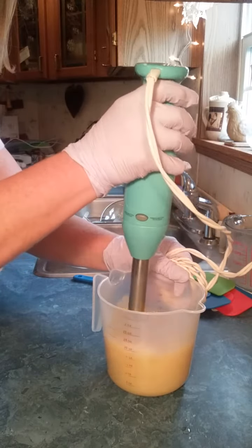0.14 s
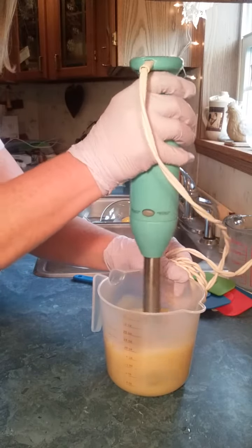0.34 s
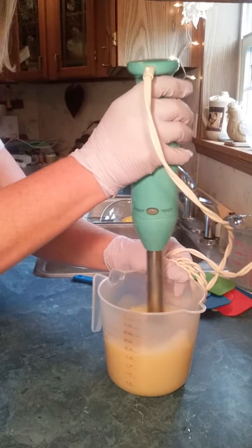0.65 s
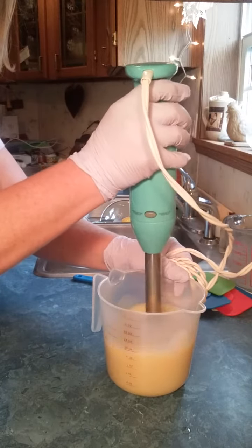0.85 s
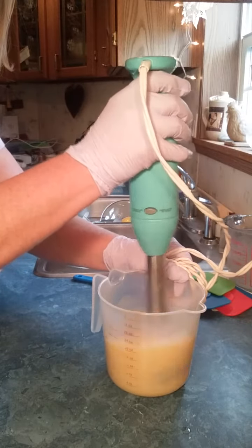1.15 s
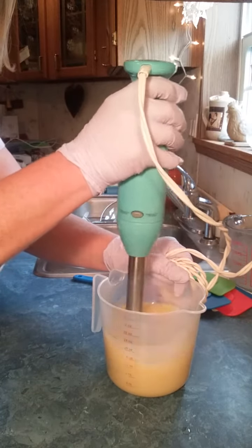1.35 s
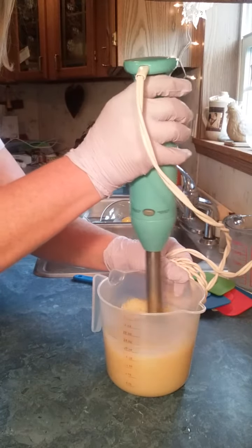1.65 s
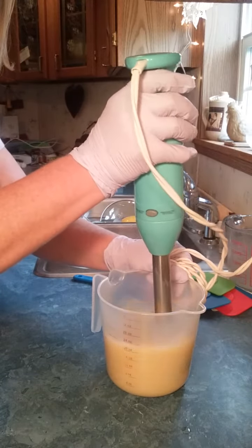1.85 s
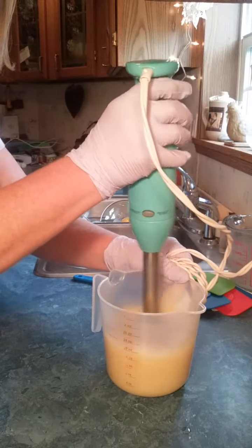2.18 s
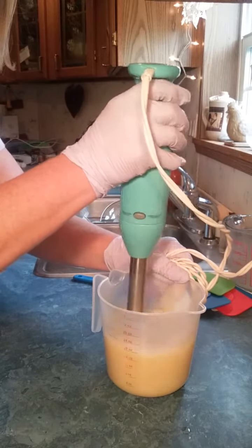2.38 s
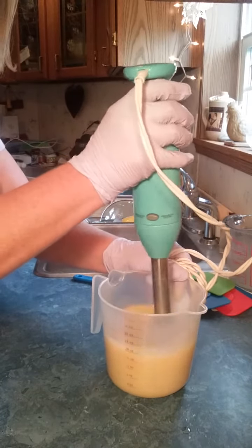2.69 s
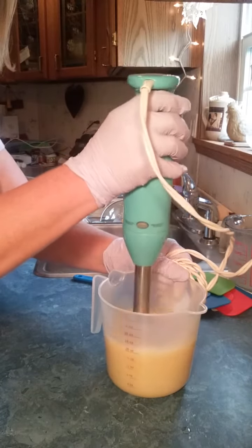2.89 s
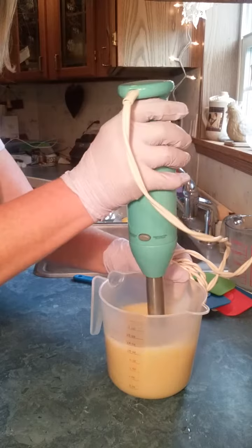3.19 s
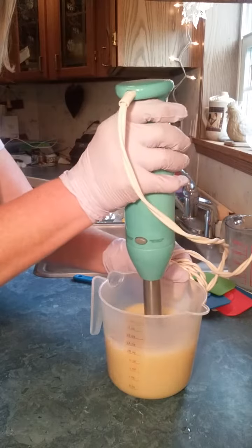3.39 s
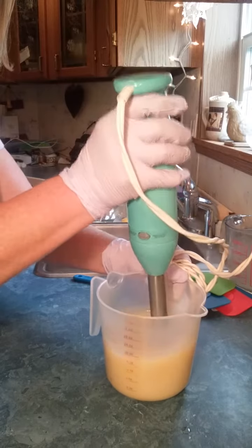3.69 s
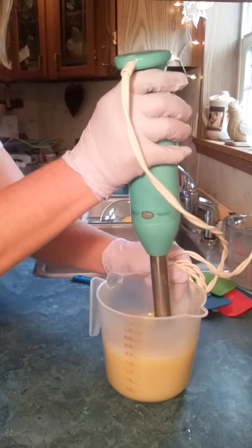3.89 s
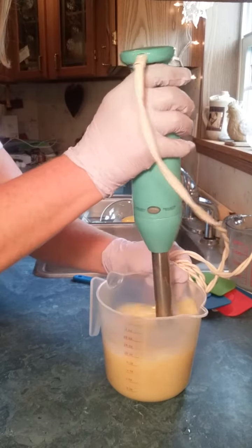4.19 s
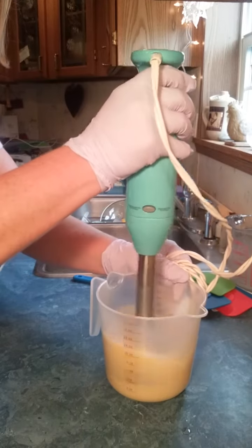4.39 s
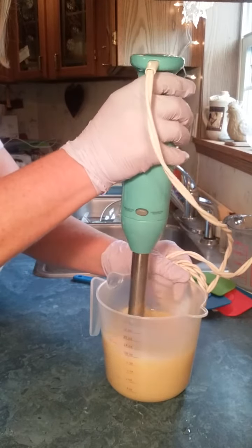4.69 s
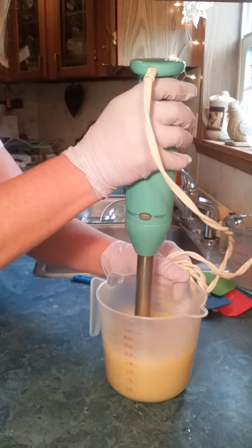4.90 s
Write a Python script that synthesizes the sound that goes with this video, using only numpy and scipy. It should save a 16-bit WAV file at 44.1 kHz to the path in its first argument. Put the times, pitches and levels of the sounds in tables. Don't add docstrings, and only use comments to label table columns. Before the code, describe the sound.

Short rattling blender bursts whir up and coast down over a low hum, as the jug ticks and thuds on a kitchen counter.

```python
import sys
import numpy as np
from scipy import signal
from scipy.fft import rfft, irfft, next_fast_len
from scipy.io import wavfile
from scipy.ndimage import uniform_filter1d

SR = 44100
rng = np.random.default_rng(int(sys.argv[2]) if len(sys.argv) > 2 else 0)


def linear_from_db(decibels):
    return 10 ** (np.asarray(decibels, float) / 20)


def wav_record(signal):
    frames = np.transpose(np.atleast_2d(signal))
    bounded = np.clip(frames, -1, 1)
    quanta = np.round(bounded * 32767).astype(np.int16)
    wavfile.write(sys.argv[1], SR, quanta)


N = 222294
TIME = np.arange(N) / SR
COARSE = np.arange(0, N / SR + .002, .001)


def level(x, db):
    return x * linear_from_db(db) / np.sqrt(np.mean(x ** 2))


def colour(x, points, rings=()):
    size = next_fast_len(len(x))
    hz = np.maximum(np.fft.rfftfreq(size, 1 / SR), 1)
    at, db = np.transpose(points)
    db = np.interp(np.log(hz), np.log(at), db)
    for centre_hz, width_hz, lift_db in rings:
        db = db + lift_db / (1 + (2 * (hz - centre_hz) / width_hz) ** 2)
    return irfft(rfft(x, size) * linear_from_db(db), size)[:len(x)]


def walk(rate):
    k = int(SR / rate)
    steps = np.repeat(rng.standard_normal(N // k + 1), k)
    return 1.306 * uniform_filter1d(uniform_filter1d(steps, k), k)[:N]


def ring(x, hz, t60):
    pole = np.exp(2j * np.pi * hz / SR - np.log(1000) / (t60 * SR))
    return signal.lfilter([1], [1, -pole], x).imag


# f/Hz, level/dB [per Hz]
ROOM = [(60, -6.5), (140, 7.5), (300, 3), (1000, -5), (2000, -34.5), (5000, -45.5), (15500, -26.5)]


def room_tone():
    return level(colour(rng.standard_normal(N), ROOM), -74.5)


def kitchen(x):
    t = np.arange(int(SR / 4)) / SR
    tail = rng.standard_normal(len(t)) * np.exp(-np.log(1000) * t / 0.34) * (t > .004)
    return signal.fftconvolve(x, level(tail, -55))[:N]


def add_at(out, s, sound):
    out[int(s * SR):][:len(sound)] += sound


# f/Hz, level/dB, t60/s
COUNTER = [(155.5, 2.5, 0.12), (232, -6.5, 0.081), (300, -16, .1)]


def counter_thud(t):
    push = np.exp(-((t - .0055) / .0015) ** 2)
    thud = sum(linear_from_db(db) * ring(push, hz, t60) for hz, db, t60 in COUNTER)
    return thud / np.abs(thud).max()


# f/Hz, level/dB [per Hz]
GULP = [(150, -21.5), (260, 1.5), (380, -4.5), (480, -8), (650, -37)]
# t/s, peak level/dB
THUDS = [(.252, -36.5), (0.288, -29), (0.721, -36.5), (1.116, -36), (1.2, -40.5), (1.217, -40),
         (1.248, -30.5), (1.299, -27.5), (1.355, -39), (1.821, -35), (2.299, -45), (2.552, -34.5),
         (2.771, -34), (2.833, -35.5), (3.094, -24.5), (3.212, -10.5), (3.762, -29.5), (3.822, -32),
         (4.375, -35.5), (4.396, -38.5), (4.465, -43.5), (4.869, -36.5), (4.935, -43), (0.336, -49),
         (1.075, -30.5), (3.605, -25), (3.515, -29), (3.565, -28), (1.76, -45)]


def jug_thuds(out, t):
    thud = counter_thud(t)
    for s, thud_db in THUDS:
        gulp = level(colour(rng.standard_normal(len(t)), GULP), -25.5)
        gulp = gulp * np.exp(-t / 0.034) * (1 - np.exp(-t / 0.013))
        add_at(out, s, linear_from_db(thud_db) * (thud + gulp))


# f/Hz, level/dB [per Hz]
JUG = [(240, -35), (400, -45), (560, -13), (760, 2), (1000, 5.5), (1300, 0.5), (1600, 0), (2200, -39.5)]
# f/Hz, level/dB [per Hz]
RATTLE = [(1000, -35), (1400, -13), (1900, -3), (2600, -9), (4200, -7), (5400, -12.5), (6500, -19),
          (7700, -30), (10000, -41), (15500, -60)]
# t/s, peak level/dB, ring f/Hz, scrape share [0-1]
TICKS = [(.229, -28.5, 854, .05), (0.253, -32.5, 2690, .35), (.289, -32.5, 703, .7), (.739, -60, 1140, .6),
         (1.036, -28.5, 2600, .1), (1.116, -23.5, 1450, 0.39), (1.199, -33.5, 910, .6),
         (1.217, -41, 1270, .5), (1.227, -26.5, 2260, 0.066), (1.246, -33.5, 1340, .5),
         (1.299, -34, 853, .5), (1.355, -37, 751, .5), (1.689, -29.5, 1070, .3), (1.815, -36.5, 1070, .5),
         (2.199, -28.5, 859, .5), (2.298, -37.5, 790, .5), (2.771, -37.5, 1070, .5), (2.833, -38, 711, .5),
         (3.023, -15, 1230, .15), (3.052, -13, 1260, .2), (3.096, -17, 1290, .3), (3.212, -32.5, 960, .4),
         (3.767, -34.5, 2060, .6), (3.822, -35, 900, .6), (4.376, -30, 660, 0.78), (4.396, -31.5, 950, .5),
         (4.465, -42.5, 1180, .6), (4.768, -22.5, 2700, 0.1507)]


def bell_ticks(out, t):
    for s, tick_db, tick_hz, share in TICKS:
        scrape = rng.standard_normal(len(t)) * np.exp(-t / 0.012) * (1 - np.exp(-t / .002))
        tick = ring(scrape, tick_hz, .012)
        broad = colour(scrape, JUG) + 1.5 * colour(scrape, RATTLE)
        share = np.clip(share, 0, 1)
        tick = (1 - share) * tick / np.abs(tick).max() + share * broad / np.abs(broad).max()
        add_at(out, s, linear_from_db(tick_db) * tick)


# t/s, click level/dB,
# ring f/Hz, thud level/dB
CLICKS = [(0.357, -33, 1000, -43), (0.813, -49, 2200, -47), (1.41, -30.5, 1100, -33),
          (1.921, -42, 2050, -35), (2.345, -39, 2000, -37), (2.895, -37, 1000, -46),
          (3.392, -26.5, 1037, -33.5), (4.021, -31, 2030, -29.5), (4.537, -25, 1240, -49),
          (4.379, -38, 2060, -58), (4.512, -56, 700, -43)]


def switch_clicks(out, t):
    thud = counter_thud(t)
    for s, click_db, click_hz, thud_db in CLICKS:
        snap = rng.standard_normal(len(t)) * np.exp(-t / .009)
        click = ring(snap, click_hz, 0.015) / 6 + 2.4 * colour(snap, RATTLE)
        add_at(out, s, linear_from_db(click_db) * click + linear_from_db(thud_db) * thud)


def bumps():
    out = np.zeros(N + SR)
    t = np.arange(int(SR / 5)) / SR
    bell_ticks(out, t)
    jug_thuds(out, t)
    switch_clicks(out, t)
    return out[:N]


# shaft starts t/s, takes up load t/s, released t/s, top speed f/Hz, drift [Hz/s]
PRESSES = [
    (-.2, -0.03, .1, 172.5, -4.5),
    (0.341, 0.361, 0.58, 175.1, 35),
    (.803, 0.809, .96, 175.3, 5),
    (1.392, 1.406, 1.63, 175.5, 25),
    (1.903, 1.918, 2.104, 174.7, 18),
    (2.326, 2.338, 2.561, 170.7, -13.5),
    (2.886, 2.897, 3.1095, 169.8, -2),
    (3.374, 3.386, 3.644, 172.9, 10),
    (4.003, 4.017, 4.153, 171.4, 18),
    (4.508, 4.518, 4.767, 170.6, 7),
]


def shaft():
    rise_s, coast_s = .025, .165
    speed, power, coast = np.zeros((3, N))
    for start, _, release, top_hz, drift in PRESSES:
        t = np.minimum(TIME, release)
        spin_up = 1 - np.exp(-np.maximum(t - start, 0) / rise_s)
        driven = (top_hz + drift * (t - release)) * spin_up
        free = 1 - np.exp(-(TIME - t) / .012)
        now = TIME >= start
        speed[now] = (driven * np.exp(-(TIME - t) / coast_s))[now]
        power[now] = ((driven / top_hz) ** 4 * (1 - free))[now]
        coast[now] = free[now]
    return speed, power, coast


def pressed(levels, up_s, fall_s):
    gain = 0
    falls = np.broadcast_to(fall_s, len(PRESSES))
    for (_, load, release, *_), row, fall in zip(PRESSES, levels, falls):
        db = np.interp(COARSE, [load + up_s, (load + release) / 2, release], row[:3])
        db = db - 42 * np.clip(1 - (COARSE - load) / up_s, 0, 1) ** 2.9
        db = db - 40 * (np.maximum(COARSE - release, 0) / fall) ** 1.297
        gain = gain + linear_from_db(db) * (COARSE >= load)
    return np.interp(TIME, COARSE, gain)


def surges(levels, half_width_s):
    gain = 0
    for (_, _, release, *_), (*_, db, late_s) in zip(PRESSES, levels):
        gain = gain + linear_from_db(db - 10 * ((COARSE - release - late_s) / half_width_s) ** 2)
    return np.interp(TIME, COARSE, gain)


def held(column):
    starts = np.array(PRESSES)[:, 0]
    return linear_from_db(np.asarray(column)[np.searchsorted(starts, TIME, side="right") - 1])


def tone(turn, order, wobble_db):
    return np.sqrt(2) * linear_from_db(wobble_db) * np.sin(order * turn + 2 * np.pi * rng.random())


def grit(turn, spread_db):
    beat = np.exp(0.078 * np.cos(turn))
    return rng.standard_normal(N) * beat * linear_from_db(spread_db * walk(300))


def flares(drive, modes):
    return sum(level(ring(drive, hz, t60), db) * linear_from_db(4.4 * walk(16)) for hz, t60, db in modes)


# f/Hz, level/dB [per Hz]
SLOSH = [(30, -15.5), (70, -15.5), (140, 7), (240, -3.5), (330, -10.5), (400, -26), (500, -14),
         (700, -12.5), (1000, -34)]


def batter_slosh(coast):
    slosh = level(colour(rng.standard_normal(N), SLOSH), -28.5)
    return slosh * linear_from_db(3.5 * walk(25.05)) * linear_from_db(2.5 * coast)


# shaft order, level/dB
WHINE = [(12, -16), (24, -24), (48, -33), (60, -40), (72, -37), (84, -40)]


def commutator_whine(turn):
    return sum(linear_from_db(db) * tone(turn, order, 2.5 * walk(24)) for order, db in WHINE)


# f/Hz, t60/s, level/dB
JUG_MODES = [(1000, .035, -10.5), (1240, 0.086, -9.5), (1450, 0.0091, -19.5)]


def jug_rattle(turn, slow, modes_gain):
    body = level(colour(grit(turn, 2.4), JUG), -4.5) * linear_from_db(1.9 * slow)
    return body + modes_gain * flares(grit(turn, 1.15), JUG_MODES)


# f/Hz, width f/Hz, level/dB
HOUSING_RINGS = [(2100, 300, 2)]
# f/Hz, t60/s, level/dB
HOUSING_MODES = [(1750, .03, -18.5), (2030, 0.028, -14), (2208, 0.046, -11.5), (2690, 0.054, -27)]
# f/Hz, t60/s, level/dB
BRUSH_MODES = [(4320, 0.005, -13), (5220, .012, -18)]


def housing_rattle(turn, quick, modes_gain):
    body = level(colour(grit(turn, 0.95), RATTLE, HOUSING_RINGS), -1.8) * linear_from_db(.6 * quick)
    body = body + modes_gain * flares(grit(turn, 2.2), HOUSING_MODES)
    return body + flares(grit(turn, 2.2), BRUSH_MODES)


# order 4 level/dB spun up, mid-press, at release; order 5 and 6 level/dB
PULL = [(-32.5, -34, -39.5, -59.5, -36.5), (-31, -40.5, -32, -53.5, -35.5),
        (-48.5, -29.5, -25, -31.5, -37.5), (-36, -27, -30, -36.5, -43), (-36, -36.5, -35, -59, -38.5),
        (-42, -37.5, -44, -44, -36.5), (-43, -54, -40.5, -53, -35), (-45.5, -42, -58, -50.5, -44),
        (-39.5, -35, -33.5, -46, -53), (-46, -35, -42, -41, -43.5)]
THIRD_DB = [1.5, -0.5, 2, -1, 0.5, -2, 2, 5, -1, -5.5]


def magnetic_pull(turn, power, jug, slow, quick):
    fourth = pressed(PULL, 0.037, 0.071)
    fifth, sixth = held(np.array(PULL)[:, 3]), held(np.array(PULL)[:, 4])
    pull = fourth * tone(turn, 4, -1.5 * slow + 1.8 * quick)
    pull = pull + power * fifth * tone(turn, 5, 3.7 * quick)
    pull = pull + power * sixth * tone(turn, 6, 1.7 * slow)
    third = linear_from_db(-15.0) * held(THIRD_DB) * tone(turn, 3, -1.5 * quick)
    seventh = linear_from_db(-8.5) * tone(turn, 7, -3.5 * quick)
    return np.sqrt(power) * (pull + jug * (third + seventh))


# level/dB spun up, mid-press, at release; surge level/dB, surge after release t/s
FIRST = [(-54, -61, -34.5, -28.5, 0.021), (-37.5, -28.5, -33, -30.5, 0.039),
         (-27, -30.5, -33.5, -22.5, 0.044), (-34, -30.5, -47, -29, .03), (-26, -28.5, -31, -35, 0.015),
         (-35.5, -37, -35.5, -35.5, .12), (-39.5, -27.5, -31.5, -50, .03), (-30, -39, -44, -20, .022),
         (-32, -36.5, -41.5, -38, 0.039), (-35.5, -40.5, -31.5, -38.5, 0.039)]
SECOND = [(-52, -39.5, -45.5, -37, 0.045), (-32.5, -47, -46, -51.5, 0.065), (-40.5, -45, -54, -36.5, .08),
          (-35.5, -38.5, -51, -43.5, 0.043), (-39.5, -39, -45.5, -47, .063),
          (-31, -52.5, -48.5, -45, 0.062), (-35, -43, -32, -39.5, 0.077), (-23, -42.5, -35.5, -31.5, 0.093),
          (-49.5, -47.5, -49, -53, 0.085), (-52, -54.5, -49, -62, 0.062)]
# f/Hz, level/dB
HUM_PATH = [(70, -6), (110, -3.5), (140, -0.5), (190, -1.5), (235, 3), (290, -6.5), (340, 0), (400, -5.5)]


def shaft_hum(turn, coast, slow, quick):
    first = pressed(FIRST, 0.042, 0.095) + surges(FIRST, .026)
    second = pressed(SECOND, 0.028, 0.18) + surges(SECOND, 0.036)
    hum = first * tone(turn, 0.99, 0.95 * slow - 1.5 * quick)
    hum = hum + second * tone(turn, 2, (2.36 + 3.5 * coast) * quick)
    return colour(hum, HUM_PATH)


# level/dB spun up, mid-press, at release; falls 40 dB in t/s; body modes level/dB
JUG_GRIP = [(-28.5, -30.5, -33, 0.32, 0), (-28.5, -26, -30.5, 0.21, -1.5), (-31.5, -34, -31, 0.46, -8),
            (-24, -27.5, -33, 0.3, 0.5), (-36, -30.5, -39, 0.38, -2.5), (-33.5, -31, -31, 0.27, -1.5),
            (-32.5, -31.5, -33, 0.26, -1), (-32, -36.5, -32.5, 0.26, -2), (-41, -34, -38, 0.32, -2),
            (-35.5, -31.5, -37, 0.25, 0.5)]
HOUSING_GRIP = [(-29.5, -26.5, -28.5, 0.265, -2), (-29.5, -27.5, -27, 0.1736, -0.5),
                (-32, -29.5, -26, 0.1761, -1), (-28.5, -28, -27.5, 0.22, -2),
                (-31, -26.5, -28, 0.2338, -0.5), (-31.5, -25.5, -26, 0.2, -0.5), (-31, -25.5, -26, 0.22, 4),
                (-29.5, -27, -27, .21, 3.5), (-30.5, -27.5, -28, 0.23, -3),
                (-30.5, -26.5, -28.5, 0.2036, 0)]


def blender():
    speed, power, coast = shaft()
    drag = 1 + (.002 + .025 * coast) * walk(50)
    turn = 2 * np.pi * np.cumsum(speed * drag) / SR
    slow, quick = walk(30.05), walk(45)
    jug_rows, housing_rows = np.array(JUG_GRIP), np.array(HOUSING_GRIP)
    jug = pressed(JUG_GRIP, 0.037, jug_rows[:, -2])
    housing = pressed(HOUSING_GRIP, 0.037, housing_rows[:, -2])
    sound = housing ** 0.57 * batter_slosh(coast)
    sound = sound + power * housing * commutator_whine(turn)
    sound = sound + jug * jug_rattle(turn, slow, held(jug_rows[:, -1]))
    sound = sound + housing * housing_rattle(turn, quick, held(housing_rows[:, -1]))
    sound = sound + magnetic_pull(turn, power, jug, slow, quick)
    return sound + shaft_hum(turn, coast, slow, quick)


def scene():
    dry = blender() + bumps()
    return (dry + kitchen(dry) + room_tone())[None]


# f/Hz, level/dB [per Hz]
HISS = [(300, -20), (1500, 3.5), (5000, -2), (8000, -0.5), (11000, -3), (15500, -4)]


def microphone_hiss(dry):
    treble = signal.butter(4, 600, "high", fs=SR, output="sos")
    power = uniform_filter1d(signal.sosfilt(treble, dry) ** 2, int(0.022 * SR))
    loudness = np.sqrt(np.maximum(power, 0))
    return level(colour(rng.standard_normal(N), HISS), -51) * np.tanh(loudness / .03) ** .5


def low_pass(x):
    return signal.sosfilt(signal.butter(12, 15710, fs=SR, output="sos"), x)


def record(dry):
    bass_cut = signal.butter(3, 80, "high", fs=SR, output="sos")
    heard = signal.sosfilt(bass_cut, dry + microphone_hiss(dry))
    return low_pass(heard)


dry = scene()
out = record(dry)
wav_record(out)
```